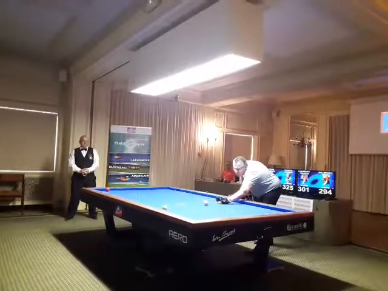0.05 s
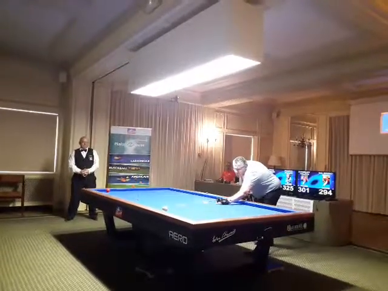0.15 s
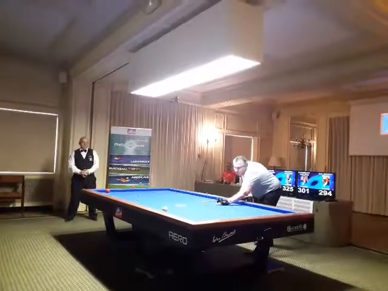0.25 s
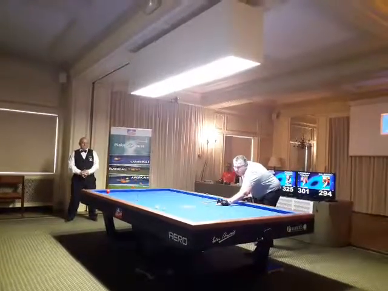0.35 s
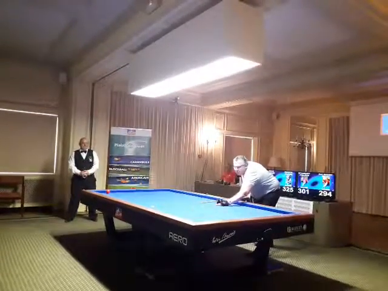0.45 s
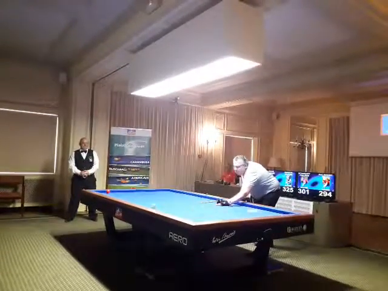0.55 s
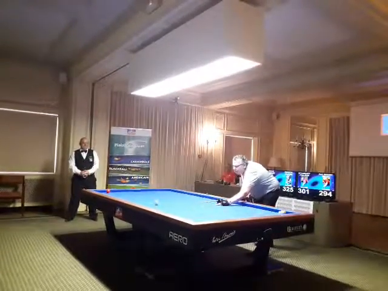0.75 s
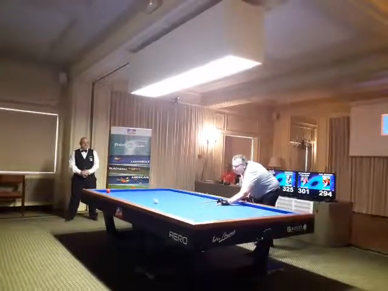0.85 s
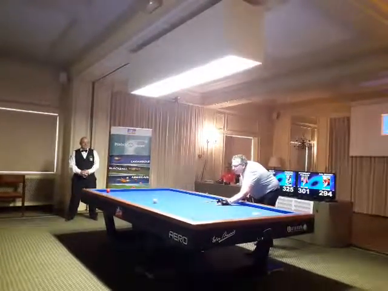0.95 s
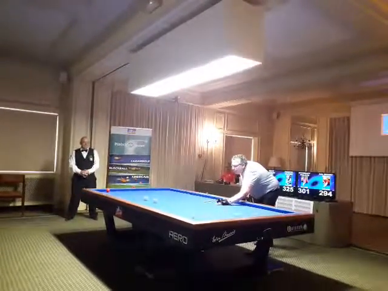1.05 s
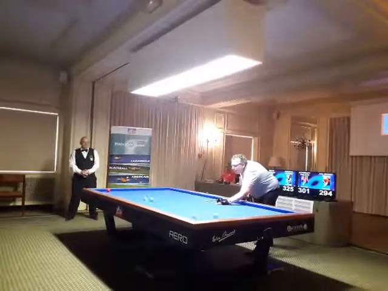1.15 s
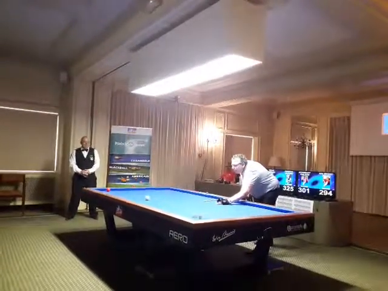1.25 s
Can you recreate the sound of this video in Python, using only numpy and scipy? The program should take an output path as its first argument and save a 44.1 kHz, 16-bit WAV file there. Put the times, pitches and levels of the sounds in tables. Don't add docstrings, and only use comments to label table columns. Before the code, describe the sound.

A billiard cue strikes a ball, which clacks hard into another, then cushion knocks in a hall

```python
import sys
import numpy as np
from scipy import signal
from scipy.fft import rfft, irfft
from scipy.io import wavfile
from scipy.ndimage import uniform_filter1d

SR = 44100
rng = np.random.default_rng(int(sys.argv[2]) if len(sys.argv) > 2 else 0)


def volts_from_db(level):
    exponent = np.asarray(level, float) / 20
    return 10 ** exponent


def generate_wav(sig):
    pcm = np.round(np.clip(np.atleast_2d(sig).T, -1, 1) * 32767).astype(np.int16)
    wavfile.write(sys.argv[1], SR, pcm)


N = 57330
T = np.arange(N) / SR
HZ = np.fft.rfftfreq(N, 1 / SR)

CLACK_S, CLACK_DB, CLACK_TAIL_DB, RING_TAIL_DB = 0.33076, 2.5, -11, -39
CLACK_HZ, CLACK_WIDTH_S = 2230, 0.00023
BALL_RING_HZ, BALL_RING_DB = 13600, -37.5
CUE_S, CUE_DB, CUE_TAIL_DB, CUE_FRAME_DB = 0.20685, -10.5, -24.5, -28
CUE_PULSE_S, CUE_REBOUND_S = 0.00008, 0.000677
KNOCK_HZ, KNOCK_WIDTH_S = 1510, 0.00038
KNOCK_RISE_S, KNOCK_BLOOM_DB, BLOOM_S = 0.0049, 5, 0.025
FRAME_RISE_S, FRAME_SCATTER_DB = 0.012, 2
PAN_DB, RIGHT_LAG_S = 4, 0.00003
TAIL_RISE_S, SPARSE_DB, DENSE_BY_S = 0.005, 0.5, 0.038
AIR_DB, HUM_DB, HUM_HZ, HUM_WIDTH_HZ = -60, -63, 99.6, 8
LOW_CUT_HZ, TOP_HZ, CLIP = 53, 16400, 0.96

# frequency in Hz, level in dB.
CLACK_COLOUR = [(300, -19.5), (1300, -7), (2250, -1), (3000, -10.5), (3900, -19), (4800, -40.5),
                (10800, -44), (13700, -75)]
RING_COLOUR = [(10300, -53.5), (11400, -4.5), (12500, 2.6), (13200, -6), (13700, -53.5)]
CUE_COLOUR = [(90, -33.5), (320, -10), (720, -6), (1450, -9.5), (2300, -10.5), (4150, -21.5), (4700, -31),
              (15500, -45.5)]
KNOCK_COLOUR = [(90, -44), (140, -25), (330, -15), (800, -10.5), (1500, -10), (2800, -23), (4800, -55),
                (9000, -100)]
# frequency in Hz, level in dB, t60 in seconds.
SHAFT = [(592, -24.5, .06), (953, -23, 0.077), (2330, -33.5, 0.045), (3130, -38, .08), (4110, -31.5, 0.031),
         (5240, -36.5, 0.023)]
# start in seconds, direct level in dB, tail level in dB, frame level in dB,
# tail brightness in dB per octave.
KNOCKS = [
    (.292, -21.5, -36.5, -34, -6),
    (0.379, -46, -27.5, -27.5, -4),
    (.5135, -12.5, -30, -29, -1.95),
    (0.627, -23, -33.5, -34.5, -2.3),
    (0.7243, -27, -38.5, -51, -3.9),
    (0.7578, -17.5, -27, -29.5, 0),
    (0.782, -13, -44.5, -32.5, -9.5),
    (0.857, -20.5, -31, -37.5, -2.5),
    (0.942, -37.5, -39, -36.5, -5.6),
    (1.02, -57, -45.5, -50, -8.5),
]
# frequency in Hz, level in dB, t60 in seconds.
FRAME = [(107.8, -12, 0.31), (153.1, -9.5, 0.33), (198.7, -13, 0.84), (245.3, -8, 0.24), (324, -0.04, 0.4),
         (415.5, -0.5, 0.24), (529.2, 3.5, 0.17), (596.5, -10, 0.31), (600, -12.5, 0.13),
         (693.8, -3.5, 0.16), (826, -2.5, 0.25), (924, -9, 0.074), (1090, -14.5, 0.13)]
# delay in seconds, left level in dB, right level in dB.
ECHOES = [(.0037, -11.5, -5.5), (.0081, -11, -13.5), (.0108, -15.5, -5.5), (.0255, -13, -22),
          (.0315, -12, -19.5)]
# frequency in Hz, t60 in seconds.
HALL = [(100, 0.73), (300, 1), (1000, .5), (2500, 0.5), (5000, 0.5), (9000, 0.39), (13000, .25)]
# frequency in Hz, left-right coherence from -1 to 1.
LIKENESS = [(60, 0.93), (130, 0.95), (290, 0.9), (640, 0.74), (1410, -0.56), (3100, 0.17), (6820, -0.01),
            (15000, 0.04)]
# frequency in Hz, left minus right in dB.
LEAN = [(60, 0.0), (110, -0.5), (200, 1.5), (380, 2.5), (700, 0), (1290, 2.0), (2380, 3.5), (4400, 3),
        (8120, 1), (15000, 5)]
# centre in seconds, length in seconds, level in dB, pitch in Hz, width in Hz.
WHISTLES = [(.52, .05, -74, 6100, 350), (.64, .05, -82, 6100, 350), (.85, .035, -76, 4900, 300),
            (.97, .035, -79, 4900, 200), (1.165, .012, -81, 4900, 300), (1.22, .012, -84, 4900, 300),
            (.85, .03, -84, 9100, 150)]
# centre in seconds, length in seconds, level in dB,
# frequency in Hz, width in Hz.
RUSTLES = [
    (0.144, 0.012, -69.5, 3704, 6480),
    (0.153, 0.036, -64.5, 2037, 2700),
    (.752, 0.0018, -80, 6480, 5000),
    (1.295, 0.007, -71.5, 2280, 908),
           (1.2515, .0025, -69, 9500, 5500),
    (1.256, .005, -73, 3000, 1200),
]
# frequency in Hz, level in dB.
AIR = [(25, -30), (70, -18), (166, -17.5), (800, -23.5), (2000, -33), (6000, -46.5), (9500, -51),
       (13000, -48.5)]
# time in seconds, level in dB.
HUM = [(0, -1.5), (.15, 11), (.4, 6), (.6, 1.5), (.95, 10), (1.1, -4), (1.3, 10)]
# time in seconds, gain in dB.
GAIN = [(0, 4.6), (.2, 4.46), (.33, 2.16), (0.347, -9), (0.364, 1), (0.549, -2), (.9, -3), (1.2, -5.5),
        (1.3, -8)]


def clack():
    body = wavelet(CLACK_HZ, CLACK_WIDTH_S)
    ring = wavelet(BALL_RING_HZ, 0.0004)
    direct = volts_from_db(CLACK_DB) * heard(CLACK_S, lambda t: body(t) + volts_from_db(BALL_RING_DB) * ring(t))
    body_tail = tail(CLACK_S, CLACK_TAIL_DB, CLACK_COLOUR)
    return direct + body_tail + tail(CLACK_S, RING_TAIL_DB, RING_COLOUR)


def wavelet(hz, width):
    return lambda t: -np.exp(-(t / np.where(t > 0, 2.1 * width, width)) ** 2) * np.cos(2 * np.pi * hz * t)


def cue():
    def bell(t, width):
        return np.exp(-0.5 * (t / width) ** 2)

    def push(t):
        blow = bell(t, CUE_PULSE_S)
        pull = 0.4 * bell(t - 0.55 * CUE_REBOUND_S, 0.00022) + 0.85 * bell(t - CUE_REBOUND_S, CUE_PULSE_S)
        spring = 0.5 * bell(t - 1.28 * CUE_REBOUND_S, 0.00005) + 0.28 * bell(t - 1.65 * CUE_REBOUND_S, 0.0002)
        return blow - pull + spring

    direct = volts_from_db(CUE_DB) * heard(CUE_S, push)
    return direct + tail(CUE_S, CUE_TAIL_DB, CUE_COLOUR) + frame(CUE_S, CUE_FRAME_DB)


def shaft():
    t = np.maximum(T - CUE_S - CUE_REBOUND_S, 0)
    ring = sum(volts_from_db(db - 60 * t / t60) * np.sin(2 * np.pi * hz * t) for hz, db, t60 in SHAFT)
    return ring * volts_from_db(np.array([[0], [-PAN_DB]]))


def cushions():
    def knock(t):
        return np.exp(-(t / KNOCK_WIDTH_S) ** 2) * np.cos(2 * np.pi * KNOCK_HZ * t)

    out = 0
    for start, db, tail_db, frame_db, tilt_db in KNOCKS:
        side = np.sign(start - 0.6)
        out = out + side * volts_from_db(db) * heard(start, knock)
        out = out + tail(start - 0.002, tail_db, KNOCK_COLOUR, tilt_db, KNOCK_RISE_S, KNOCK_BLOOM_DB)
        out = out + frame(start, frame_db)
    return out


def frame(at, db):
    t = np.maximum(T - at, 0)
    ring = 0
    for hz, mode_db, t60 in FRAME:
        scatter, detune, phase, spread = rng.standard_normal(4)
        level = volts_from_db(mode_db + FRAME_SCATTER_DB * scatter - 60 * t / t60)
        phases = np.array([[phase], [phase + hz / 900 * spread]])
        ring = ring + level * np.sin(2 * np.pi * hz * (1 + 0.0074 * detune) * t + phases)
    return volts_from_db(db) * ring * (1 - np.exp(-t / FRAME_RISE_S))


def heard(at, pulse):
    out = np.array([pulse(T - at), volts_from_db(-PAN_DB) * pulse(T - at - RIGHT_LAG_S)])
    for lag, *levels in ECHOES:
        jitter = 0.00008 * rng.standard_normal(2)
        out += np.array([volts_from_db(db) * pulse(T - at - lag - j) for db, j in zip(levels, jitter)])
    return out


def tail(at, db, colour, tilt_db=0., rise=TAIL_RISE_S, bloom_db=0.):
    spectrum = pair(colour, tilt_db)
    start = int(at * SR)
    t = T[:N - start]
    octave = np.log2(np.maximum(HZ, 88))
    out = 0
    for hz in 88 * 2 ** np.arange(0, 8.):
        share = np.clip(1 - abs(octave - np.log2(hz)), 0, 1)
        out = out + irfft(spectrum * share, N)[:, start:] * volts_from_db(-60 * t / table(HALL, hz))
    lumps = unit(uniform_filter1d(rng.standard_normal((2, N)), size=60))[:, start:]
    lumps_db = SPARSE_DB * lumps * np.exp(-t / DENSE_BY_S)
    swell_db = bloom_db * np.exp(-(t / BLOOM_S) ** 2)
    shape = volts_from_db(db + lumps_db + swell_db) * (1 - np.exp(-t / rise))
    return np.pad(shape * out, ((0, 0), (start, 0)))


def pair(colour, tilt_db=0.):
    alike = np.clip((table(LIKENESS, HZ) - 0.3) / 0.73, 0, 1) ** 0.5
    mid, side = rfft(rng.standard_normal((2, N)))
    z = np.array([np.sqrt(1 + alike) * mid + sign * np.sqrt(1 - alike) * side for sign in (1, -1)])
    lean = volts_from_db(np.outer([0.5, -0.5], table(LEAN, HZ)))
    low_cut = np.minimum(HZ / colour[0][0], 1) ** 3
    tilt = tilt_db * np.log2(np.maximum(HZ, 30) / 700)
    z = z * low_cut * lean * volts_from_db(table(colour, HZ) + tilt)
    return z / np.sqrt(np.mean(irfft(z, N) ** 2))


def table(points, hz):
    p = np.array(points, float)
    return np.interp(np.log(np.maximum(hz, 1)), np.log(p[:, 0]), p[:, 1])


def unit(x):
    return x / np.sqrt(np.mean(x ** 2))


def room():
    def band(hz, width):
        noise = rfft(rng.standard_normal(N))
        return unit(irfft(noise / (1 + ((HZ - hz) / width * 2) ** 4), N))

    air = volts_from_db(AIR_DB) * irfft(pair(AIR), N)
    swell_db = np.interp(T, *np.array(HUM).T)
    waver = 0.15 * band(HUM_HZ, HUM_WIDTH_HZ)
    out = air + volts_from_db(HUM_DB + swell_db) * (np.sin(2 * np.pi * HUM_HZ * T) + waver)
    for centre, length, db, hz, width in RUSTLES + WHISTLES:
        swell = np.exp(-0.5 * ((T - centre) / length) ** 2)
        out = out + volts_from_db(db) * swell * np.array([band(hz, width), band(hz, width)])
    return out


def scene():
    return clack() + cue() + shaft() + cushions() + room()


def band_limit(x):
    return signal.sosfilt(signal.butter(12, 16840, fs=SR, output="sos"), x)


def record(dry):
    low_cut = signal.butter(2, LOW_CUT_HZ, "high", fs=SR, output="sos")
    mic = signal.sosfilt(low_cut, dry)
    gain_db = np.interp(T, *np.array(GAIN).T)
    mic = np.clip(mic * volts_from_db(gain_db), -CLIP, CLIP)
    mix = irfft(rfft(mic) / (1 + (HZ / TOP_HZ) ** 40), N)
    return band_limit(mix)


dry = scene()
out = record(dry)
generate_wav(out)
```